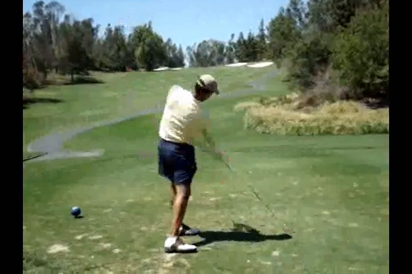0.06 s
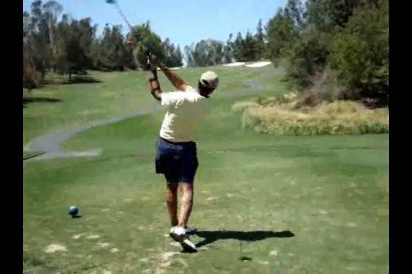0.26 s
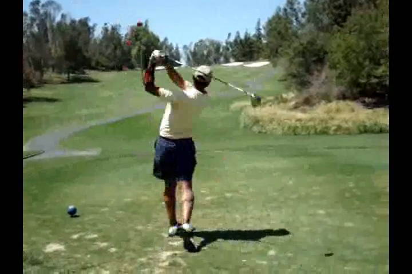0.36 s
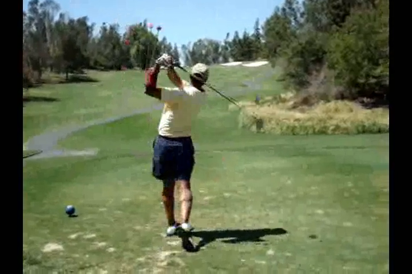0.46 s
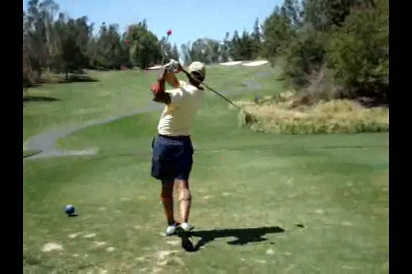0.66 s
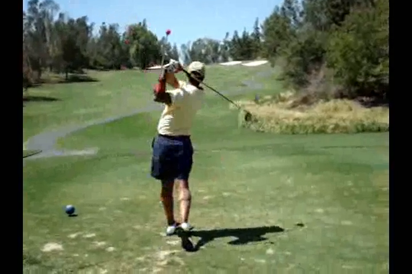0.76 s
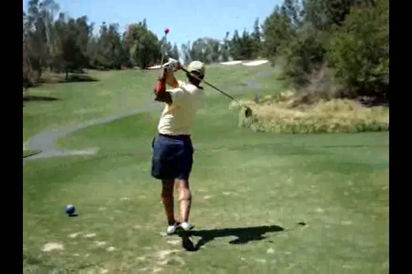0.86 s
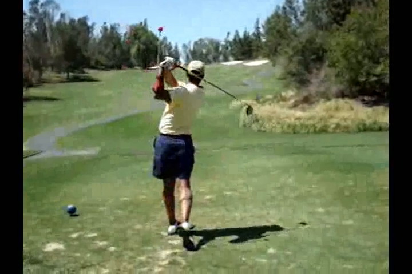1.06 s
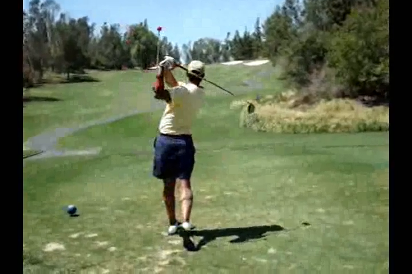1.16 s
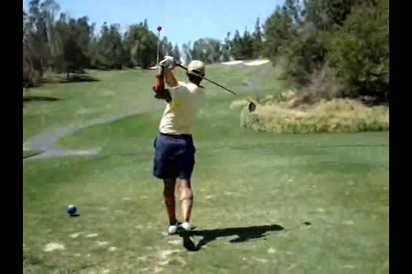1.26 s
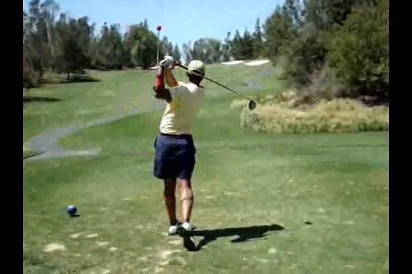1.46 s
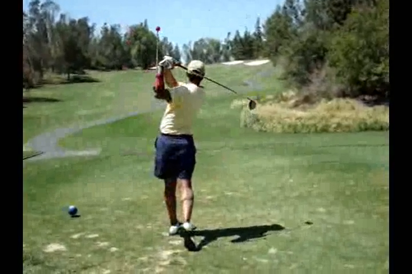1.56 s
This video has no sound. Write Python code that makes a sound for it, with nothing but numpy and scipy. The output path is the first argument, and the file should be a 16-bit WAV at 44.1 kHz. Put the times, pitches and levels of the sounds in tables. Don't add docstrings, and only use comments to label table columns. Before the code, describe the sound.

Hard, bright crack of a hollow metal golf club on a ball, after a quick swing whoosh

```python
import sys
import numpy as np
from scipy import signal
from scipy.io import wavfile
from scipy.ndimage import uniform_filter1d

SR = 44100
rng = np.random.default_rng(int(sys.argv[2]) if len(sys.argv) > 2 else 0)


def volts(x):
    e = np.asarray(x, float) / 20
    return 10 ** e


def dump_mix(stems):
    frames = np.atleast_2d(stems).T
    limited = np.clip(frames, -1, 1)
    pcm = np.round(limited * 32767).astype(np.int16)
    wavfile.write(sys.argv[1], SR, pcm)


N = 70560
T = np.arange(N) / SR
CLICK = (np.arange(N) == 0) * 1.0
HIT_S = 0.27135


def rms_one(x):
    return x / np.sqrt(np.mean(x ** 2) + 1e-20)


def in_time(rows):
    s, *columns = np.transpose(rows)
    return [np.interp(T, s, c) for c in columns]


def at_hz(points, hz, column=1):
    points = np.array(points)
    return np.interp(np.log(hz), np.log(points[:, 0]), points[:, column])


def at(s, x):
    return np.interp(T - s, T, x, left=0)


def filtered(x, order, hz, kind):
    return signal.sosfilt(signal.butter(order, hz, kind, fs=SR, output="sos"), x)


def drift(rate_hz):
    r = np.exp(-20 * np.pi * rate_hz / SR)
    slow = signal.lfilter([1], [1, -2 * r, r * r], rng.standard_normal(N // 10 + 2002))[2000:]
    return np.interp(np.arange(N) / 10, np.arange(len(slow)), rms_one(slow))


def ring(clicks, hz, t60):
    r = volts(-60 / (t60 * SR))
    w = 2 * np.pi * hz / SR
    return signal.lfilter([0, np.sin(w)], [1, -2 * r * np.cos(w), r * r], clicks + 1e-18)


def bands(x):
    edges = 25 * 2 ** np.arange(0, 9.6, 0.5)
    for k, (low, high) in enumerate(zip(edges, edges[1:])):
        yield np.sqrt(low * high), filtered(x[k % 2], 2, [low, high], "band")


def banded_noise(spectrum, patchy_db, rate_hz):
    total = 0
    for hz, band in bands(rng.standard_normal((2, N))):
        total = total + volts(at_hz(spectrum, hz) + patchy_db * drift(rate_hz)) * band
    return rms_one(total)


# pitch_hz [Hz], density_db [dB per Hz]
AIR_SPECTRUM = [(15, -57), (25, -30), (181, -1), (494, -3.5), (667, -2.5), (737, -6), (1160, -8),
                (7780, -24), (10000, -21.5), (13000, -47.5), (22000, -120)]


def air():
    return volts(-47) * banded_noise(AIR_SPECTRUM, patchy_db=1.0, rate_hz=24)


# start_s [s], level_db [dB], pitch_hz [Hz]
THUD_EVENTS = [
    (0.033, -28.5, 94),
    (0.628, -30, 158),
    (0.6442, -24.5, 226),
    (0.653, -20, 185),
    (0.6608, -23, 197),
    (0.721, -33.5, 121),
]
THUD_CYCLES = 1.76


def thuds():
    out = 0
    for s, db, hz in THUD_EVENTS:
        push = ring((np.arange(N) == int(s * SR)) * 1.0, hz, THUD_CYCLES / hz)
        soft_start = 1 - np.exp(-np.maximum(T - s, 0) * hz * 10)
        out = out + volts(db) * push * soft_start
    return out


# pitch_hz [Hz], width_hz [Hz], level_db [dB]
SMEARED_MODES = [(1154, 228, -6.5), (3780, 330, -5), (4960, 250, -11.5), (5690, 450, 1.5), (6900, 450, 2.1),
                 (7580, 590, 5.5)]
BACK_CLICK_DB, BACK_MODES_DB = 3.5, -1.5


def smeared():
    modes = sum(volts(db) * ring(CLICK, hz, 1.66 / width) for hz, width, db in SMEARED_MODES)
    return volts(BACK_CLICK_DB) * CLICK + volts(BACK_MODES_DB) * modes


# start_s [s], level_db [dB]
WOODS_DEPTH = [(.339, -50), (.342, -25), (.353, -26), (.371, -31), (.385, -24), (.42, -27), (.46, -31.5),
               (.53, -37), (.75, -50.5)]
# pitch_hz [Hz], level_db [dB], extra_loss_db_per_s [dB/s]
RETURN_COLOUR = [(300, -8, 1), (930, 12, -23), (2500, -8, 1.5), (4320, 1.5, -4.5), (6500, 1.5, 4),
                 (7800, 5.5, 67), (10000, 7.5, 18)]
LEAVES_PER_S, LEAF_SPREAD_DB = 7000, 3.0
PATHS_PATCHY_DB, WOODS_END_DB_PER_S = 0.5, 61


def woods(blow):
    first_s, last_s = WOODS_DEPTH[0][0], WOODS_DEPTH[-1][0]
    level_db, = in_time(WOODS_DEPTH)
    level_db = level_db - WOODS_END_DB_PER_S * np.maximum(T - last_s, 0) - 200 * (T < first_s)
    present = rng.random((2, N)) < LEAVES_PER_S / SR
    size = volts(LEAF_SPREAD_DB * np.minimum(rng.exponential(1, (2, N)), 4))
    leaves = present * size * rng.choice([-1, 1], (2, N))
    late = np.maximum(T - first_s, 0)
    paths = 0
    for hz, band in bands(rms_one(leaves)):
        loss_db = at_hz(RETURN_COLOUR, hz, column=2) * late
        paths = paths + volts(at_hz(RETURN_COLOUR, hz) - loss_db + PATHS_PATCHY_DB * drift(11)) * band
    return signal.fftconvolve(volts(level_db) * paths / 10, blow + smeared())[:N]


SLAP_BLUR_S = 0.0012


def dull(x, hz):
    face = rng.standard_normal(300) * np.exp(-T[:300] / SLAP_BLUR_S) / 5
    face[0] = 1
    return filtered(signal.fftconvolve(x, face)[:N], 2, [750, hz], "band")


# start_s [s], level_db [dB], ring_db [dB], dulled_above_hz [Hz]
SLAP_EVENTS = [
    (0.3528, -14.5, 5, 9500),
    (0.3853, -17.5, 14, 3000),
    (.444, -24.5, -9, 2500),
    (0.52, -18, -18, 2000),
    (0.601, -32, -28, 1300),
]


def slaps(blow, rung):
    out = 0
    for s, db, ring_db, hz in SLAP_EVENTS:
        out = out + volts(db) * dull(at(s, blow + volts(ring_db) * rung), hz)
    return out


# start_s [s], level_db [dB], pitch_hz [Hz]
SWING_PATH = [
    (.15, -65, 380),
    (.19, -47, 450),
    (.215, -37, 560),
    (.235, -32, 720),
    (.252, -30, 590),
    (.27, -30, 760),
    (.3, -33, 700),
    (.345, -45, 500),
    (.4, -60, 500),
]
# pitch_hz [Hz], density_db [dB per Hz]
WAKE_SPECTRUM = [(150, -32), (400, -16), (800, -1), (1600, -6.5), (3000, -13), (5000, -16), (8000, -21.5),
                 (10500, -26.5)]
SHEDDING_CYCLES, SHEDDING_STOP_DB_PER_S = 12, 1500
WHOOSH_WIDTH = 0.22
WAKE_DB, WAKE_FOLLOWS = -34, 0.76


def whoosh():
    level_db, hz = in_time(SWING_PATH)
    shed = 0
    for centre in np.geomspace(330, 1100, 10):
        share = np.exp(-(np.log(centre / hz) / WHOOSH_WIDTH) ** 2)
        shed = shed + share * rms_one(ring(rng.standard_normal(N), centre, SHEDDING_CYCLES / centre))
    shed = shed / np.sqrt(uniform_filter1d(shed ** 2, size=700) + 1e-9)
    wake_db = WAKE_DB + WAKE_FOLLOWS * (level_db - level_db.max())
    wake = volts(wake_db) * banded_noise(WAKE_SPECTRUM, patchy_db=1.0, rate_hz=40)
    return volts(level_db - SHEDDING_STOP_DB_PER_S * np.maximum(T - HIT_S, 0)) * shed + wake


# pitch_hz [Hz], density_db [dB per Hz]
SHELL_SPECTRUM = [(300, -16.5), (1800, -8), (2400, -28), (4000, -10.5), (6000, -5), (7500, -2), (9000, -18),
                  (11000, -9.5)]
SHELL_DB, SHELL_T60_S, SHELL_SWELL_S = -18, 0.57, 0.00033


def shell():
    envelope = volts(SHELL_DB - 60 * T / SHELL_T60_S) * (1 - np.exp(-T / SHELL_SWELL_S))
    return envelope * banded_noise(SHELL_SPECTRUM, patchy_db=3.0, rate_hz=40)


# pitch_hz [Hz], level_db [dB], t60_s [s], swell_s [s]
HEAD_MODES = [(3300, -27, .2, .001), (3445, -21, .12, .001), (3750, -29, .09, .001), (4520, -28, .3, .002),
              (4775, -21, .3, .002), (4850, -26, .3, .002), (5120, -31, .3, .002), (5730, -15, .3, .03),
              (5790, -17, .3, .04), (6965, -15, .15, .003), (7025, -19, .2, .003), (7890, -23, .05, .002),
              (8925, -24, .15, .002), (9980, -30, .11, .002)]
FLUTTER_DB, FLUTTER_HZ = 1.5, 60
GLIDE_PER_S, WANDER_TURNS = 0.12, 0.1


def head():
    out = 0
    for hz, db, t60, swell in HEAD_MODES:
        envelope = volts(db + FLUTTER_DB * drift(FLUTTER_HZ) - 60 * T / t60) * (1 - np.exp(-T / swell))
        turns = hz * T * (1 + GLIDE_PER_S * T) + WANDER_TURNS * drift(FLUTTER_HZ)
        out = out + envelope * np.sin(2 * np.pi * turns)
    return out


HOLD_S, TURN_DB_PER_S = 0.036, 738
TURN_TAIL_DB, TURN_TAIL_DB_PER_S = -12.5, 294


def turned_away():
    return volts(-TURN_DB_PER_S * np.maximum(T - HOLD_S, 0)) + volts(TURN_TAIL_DB - TURN_TAIL_DB_PER_S * T)


# pitch_hz [Hz], level_db [dB], t60_s [s]
BALL_MODES = [(1280, -7, .006), (2100, -12, .004), (2700, -12, .005)]
KNOCK_DB, CONTACT_S, KNOCK_LOW_HZ = -0.5, 0.00034, 350


def knock():
    push = -np.sin(np.pi * np.clip(T / CONTACT_S, 0, 1)) ** 2
    modes = sum(volts(db) * ring(CLICK, hz, t60) for hz, db, t60 in BALL_MODES)
    return filtered(volts(KNOCK_DB) * (push / 2 - modes), 1, KNOCK_LOW_HZ, "high")


BACK_RING_T60_S = 0.019


def scene():
    blow, modes, minor = knock(), head(), shell()
    back = volts(-60 * T / BACK_RING_T60_S) * (modes / 2 + minor)
    direct = np.roll(blow + turned_away() * (modes + minor), int(HIT_S * SR)) * (T >= HIT_S - 1 / SR)
    return (air() + thuds() + woods(blow) + slaps(blow, back) + whoosh() + direct)[None]


# centre_s [s], half_length_s [s], from_hz [Hz], level_db [dB]
TREBLE_DIPS = [
    (0.2624, 0.0082, 2870, -39),
    (.336, 0.0086, 5000, -47),
]
EARLY_NOISE_DB, EARLY_NOISE_DB_PER_S = -22, 4500
HIGH_CUT_HZ, LOW_CUT_HZ = 10130, 69


def top_cut(x):
    return signal.sosfilt(signal.butter(12, 11040, fs=SR, output="sos"), x)


def record(dry):
    x = dry
    for s, half, hz, db in TREBLE_DIPS:
        treble = signal.sosfiltfilt(signal.butter(4, hz, "high", fs=SR, output="sos"), x)
        x = x - treble * (1 - volts(db)) * np.exp(-((T - s) / half) ** 4)
    early_db = EARLY_NOISE_DB - EARLY_NOISE_DB_PER_S * np.abs(T - HIT_S)
    x = x + volts(early_db) * (T < HIT_S) * rng.standard_normal(N)
    x = signal.sosfilt(signal.ellip(10, 0.5, 40, HIGH_CUT_HZ, fs=SR, output="sos"), x)
    x = signal.sosfilt(signal.cheby2(8, 50, HIGH_CUT_HZ * 1.2, fs=SR, output="sos"), x)
    x = filtered(x, 2, LOW_CUT_HZ, "high")
    return top_cut(x)


dry = scene()
out = record(dry)
dump_mix(out)
```